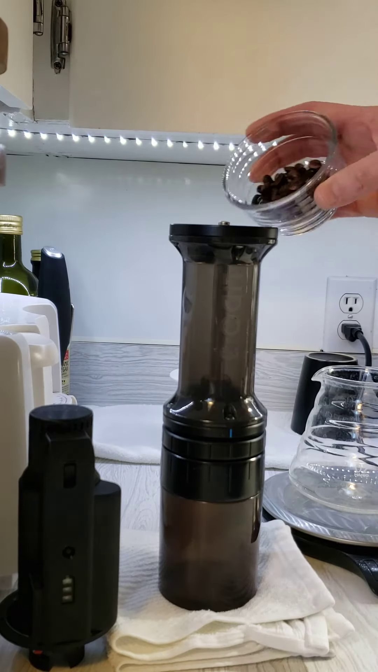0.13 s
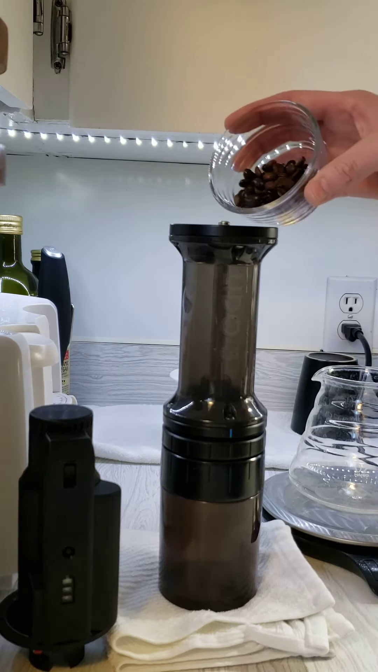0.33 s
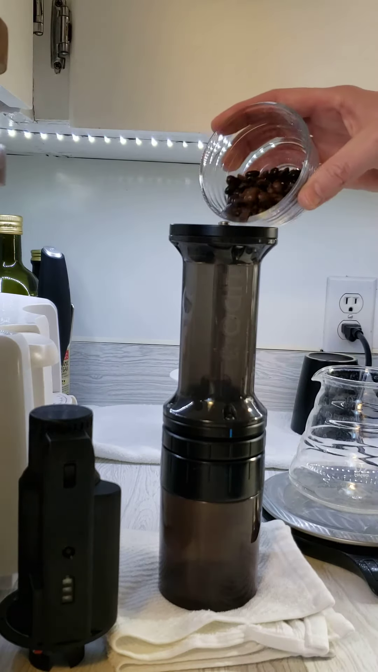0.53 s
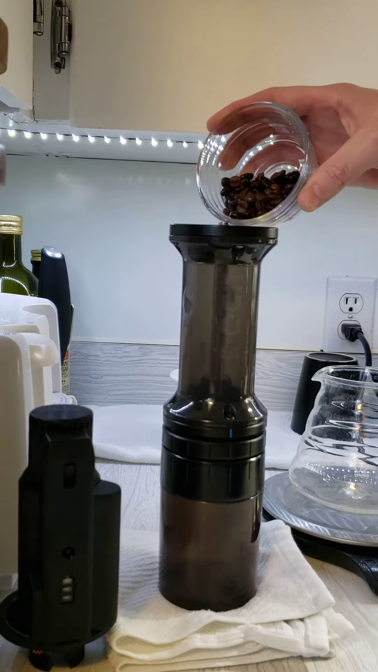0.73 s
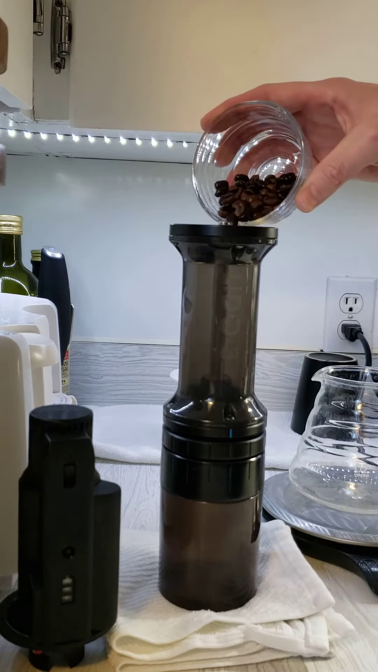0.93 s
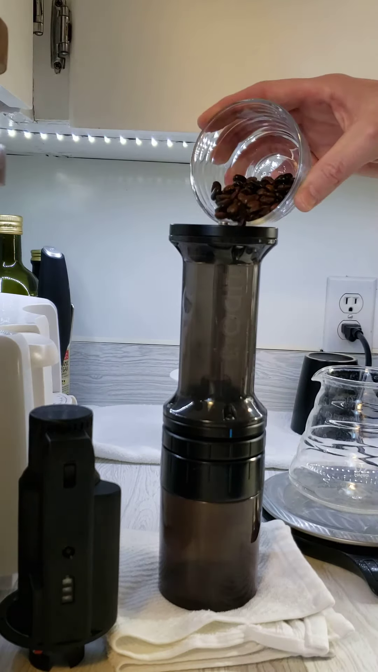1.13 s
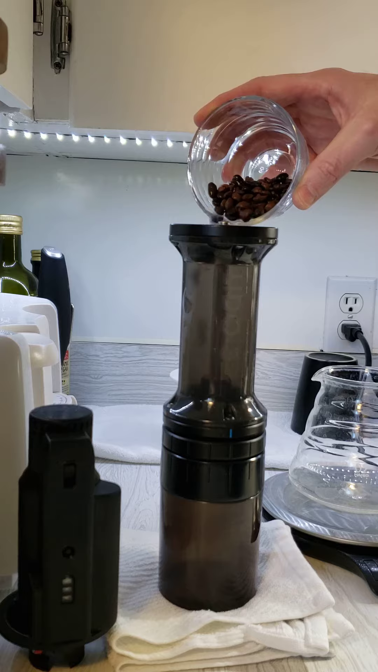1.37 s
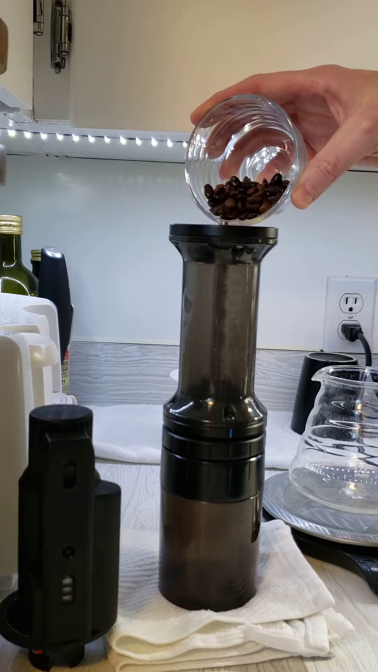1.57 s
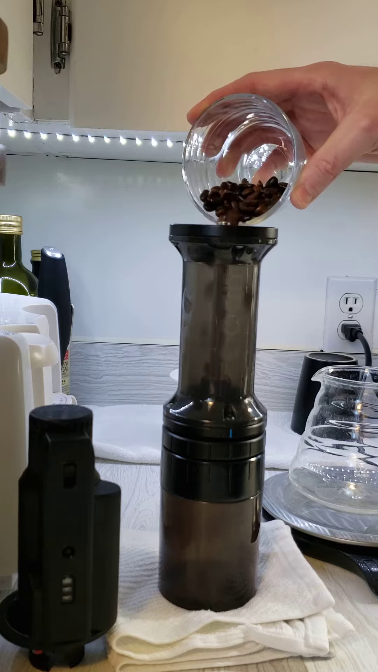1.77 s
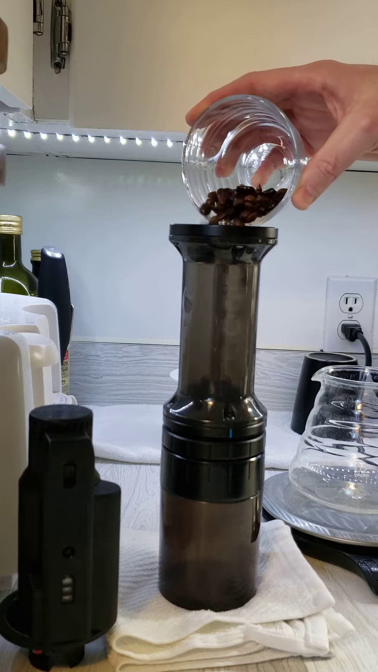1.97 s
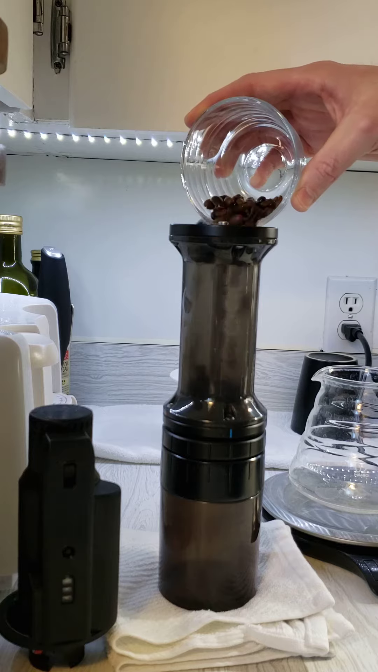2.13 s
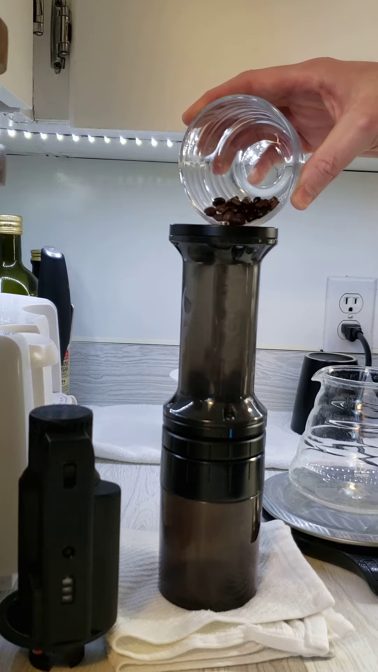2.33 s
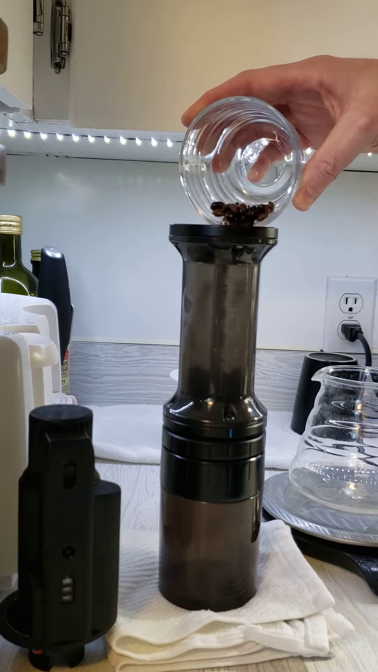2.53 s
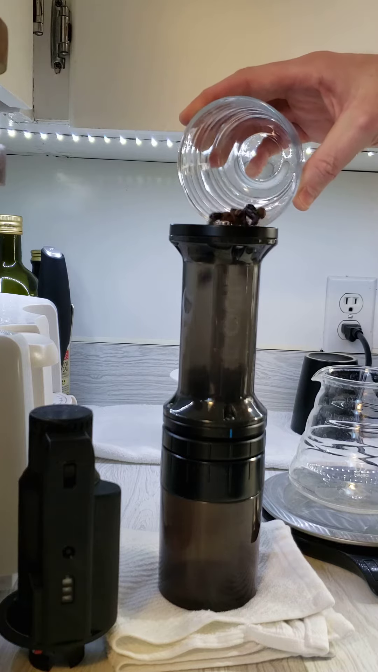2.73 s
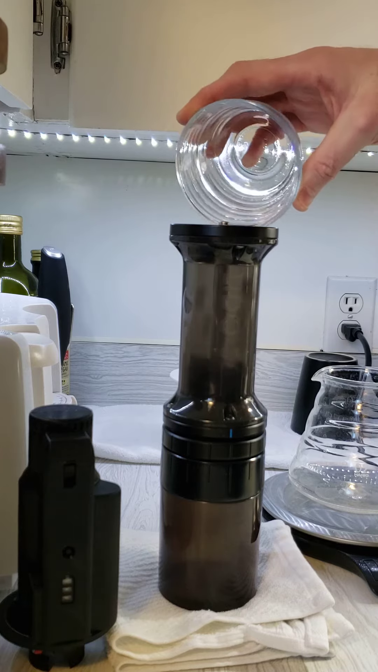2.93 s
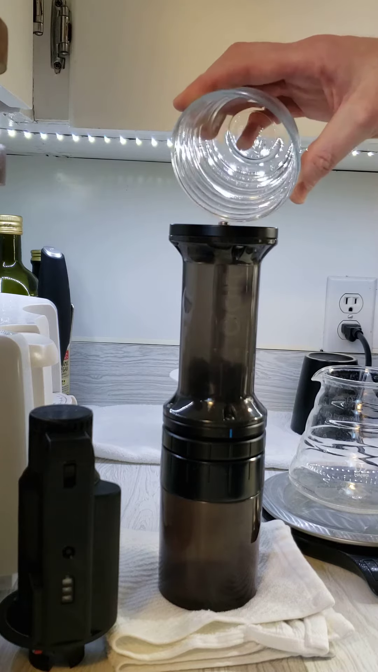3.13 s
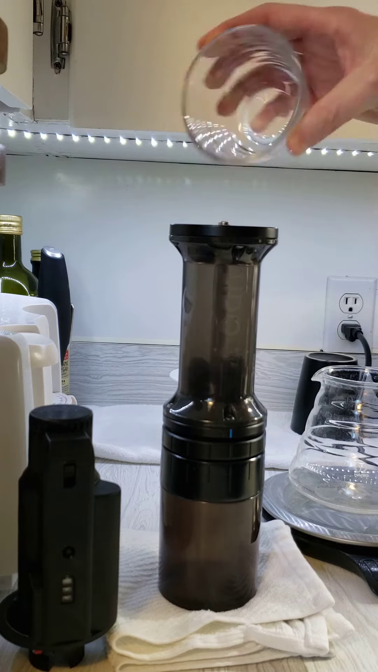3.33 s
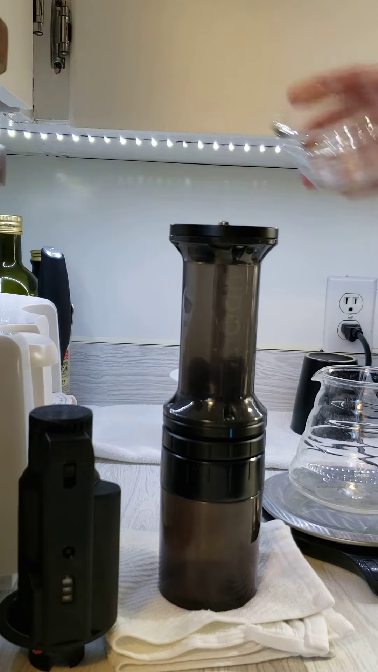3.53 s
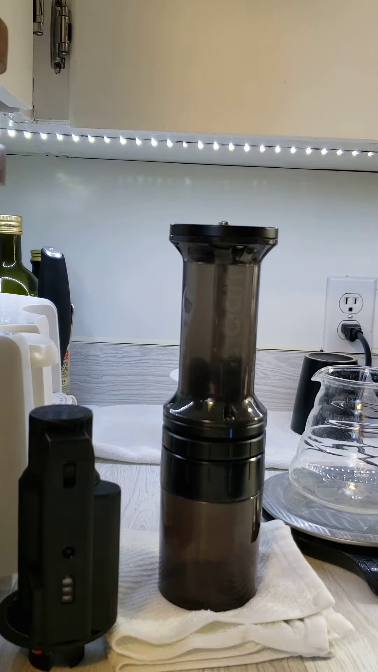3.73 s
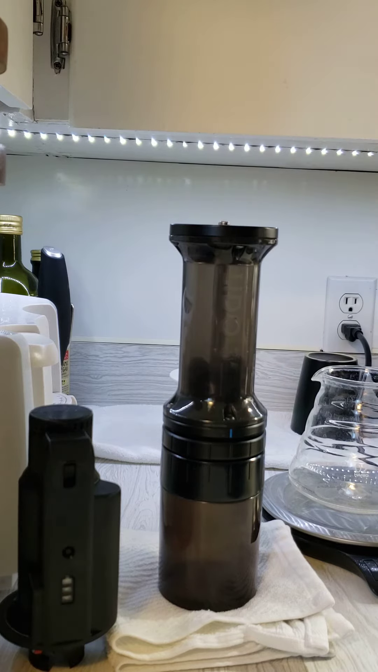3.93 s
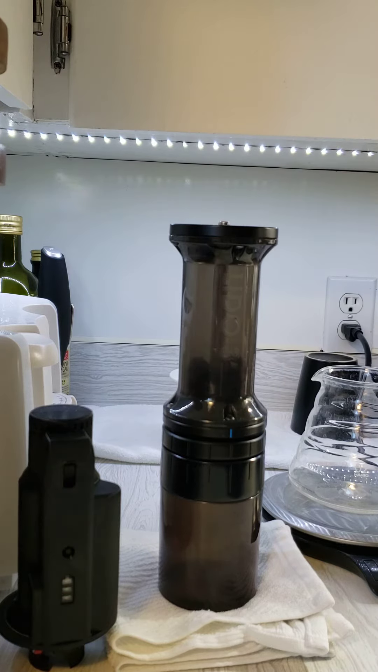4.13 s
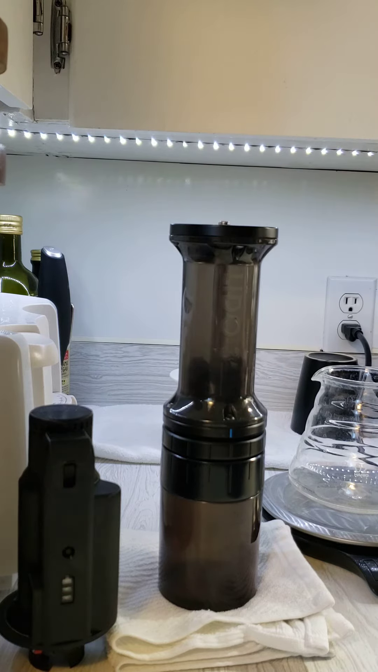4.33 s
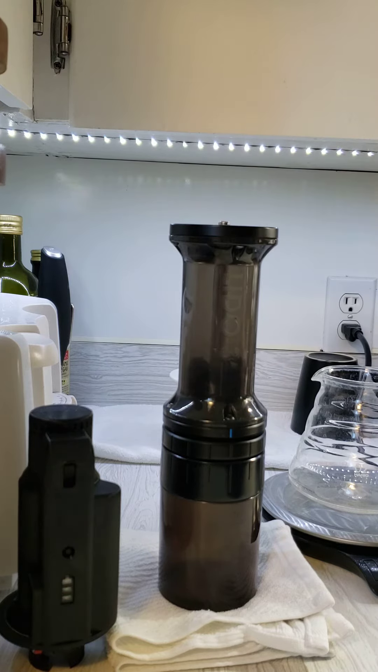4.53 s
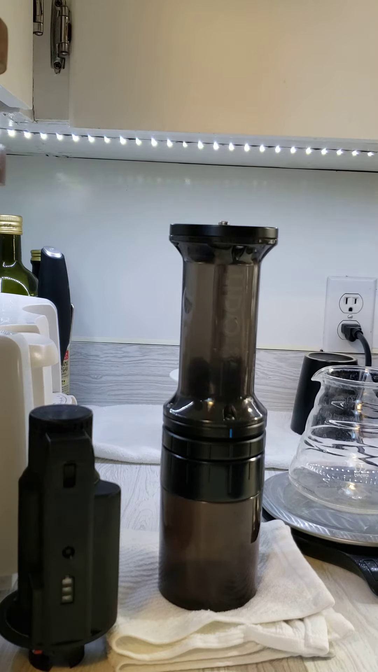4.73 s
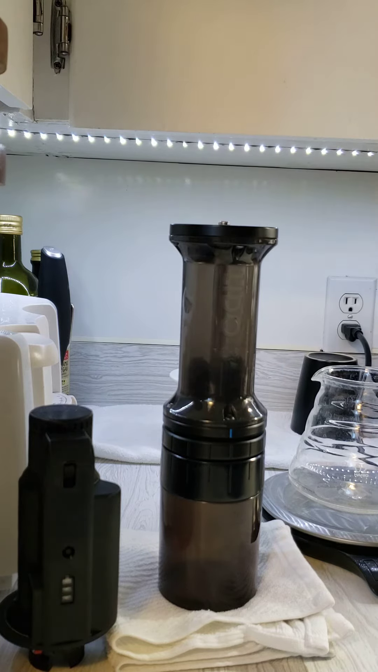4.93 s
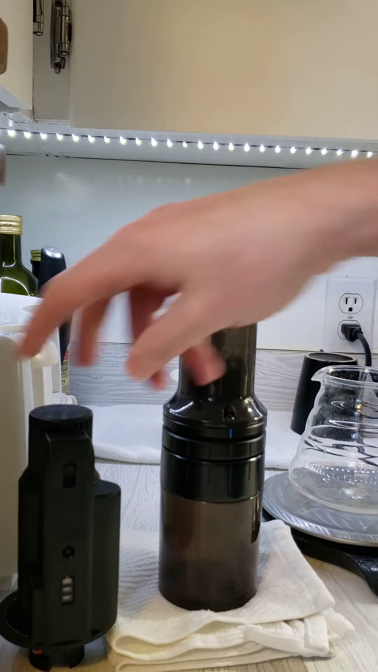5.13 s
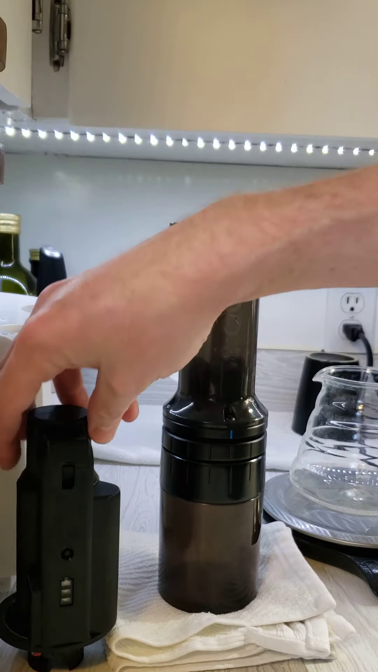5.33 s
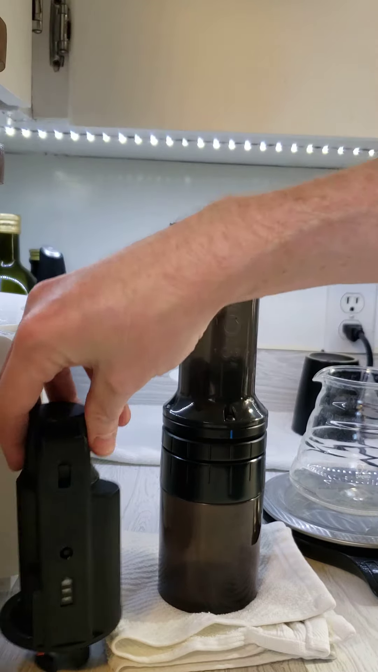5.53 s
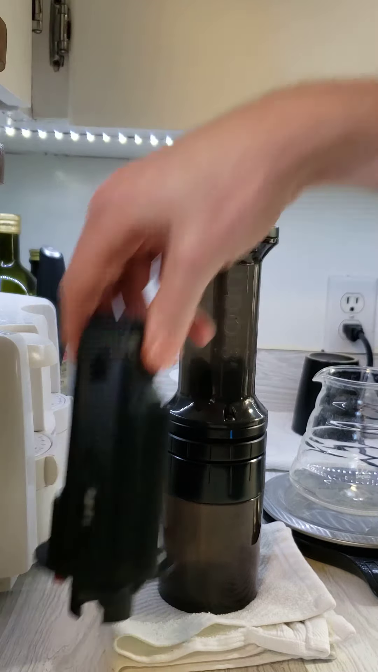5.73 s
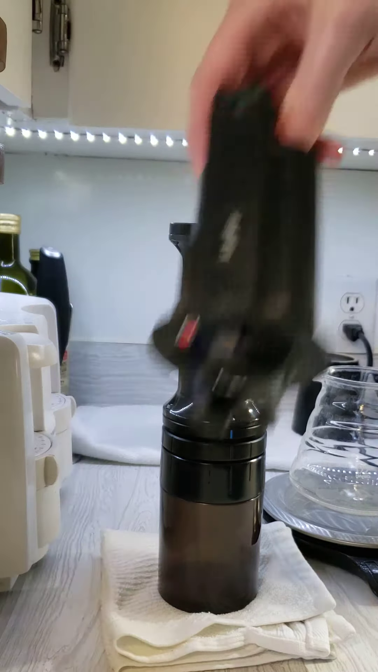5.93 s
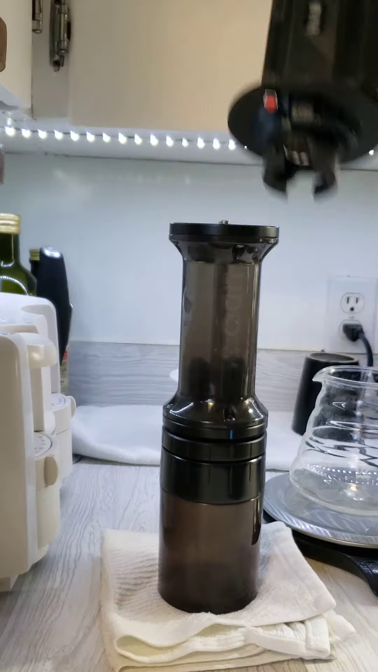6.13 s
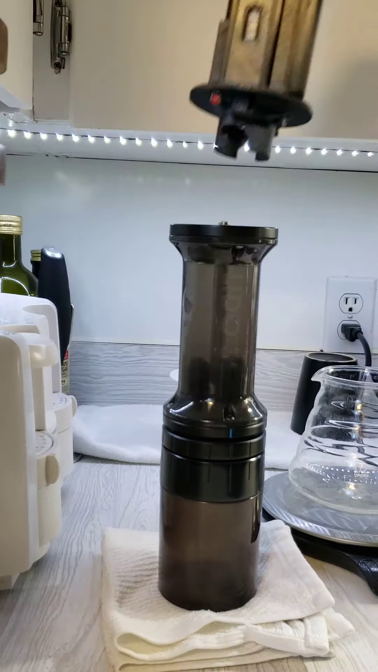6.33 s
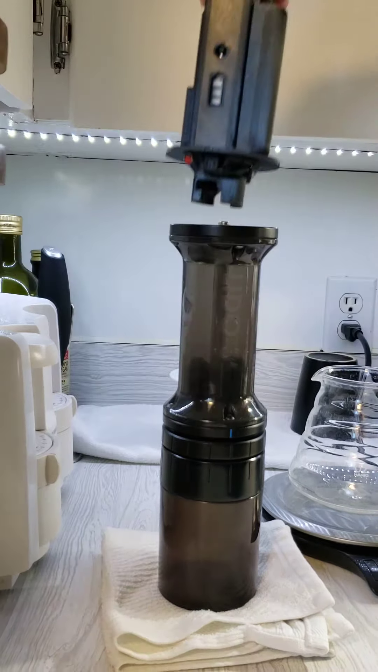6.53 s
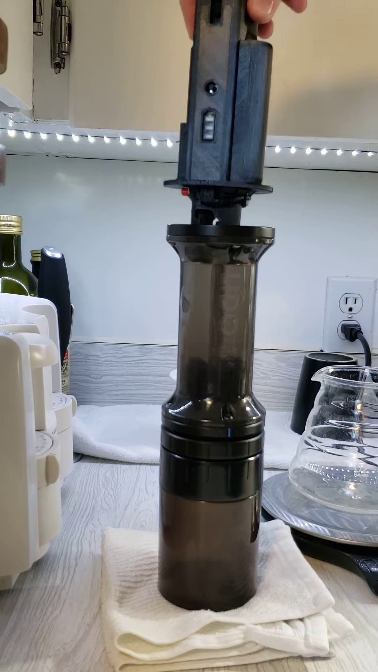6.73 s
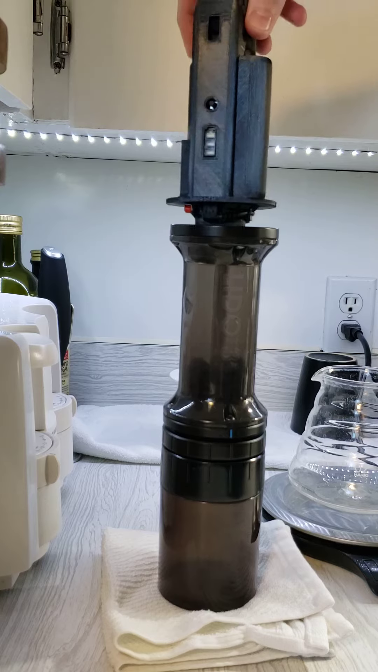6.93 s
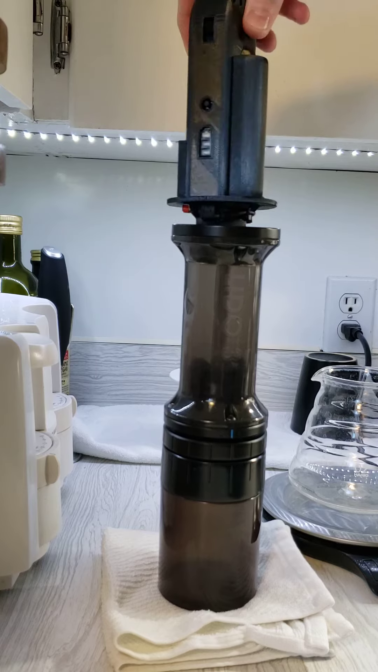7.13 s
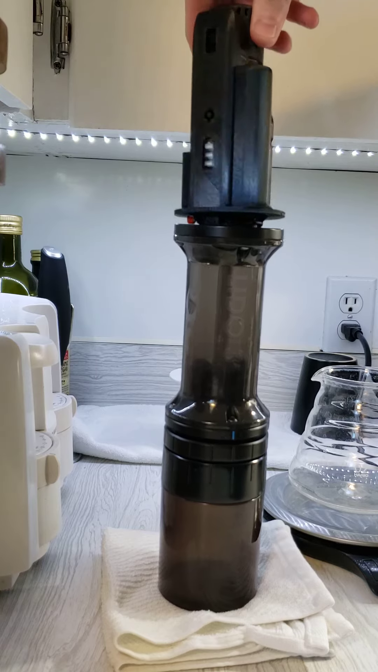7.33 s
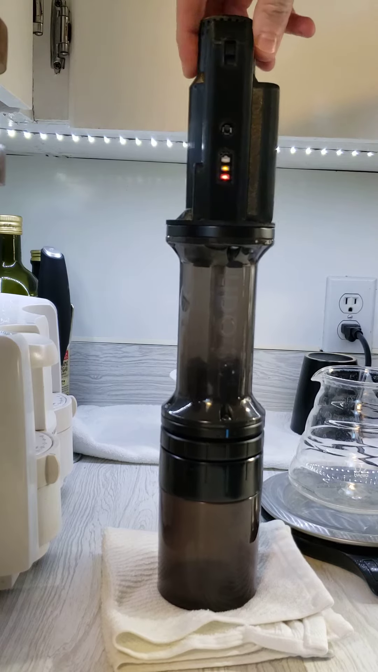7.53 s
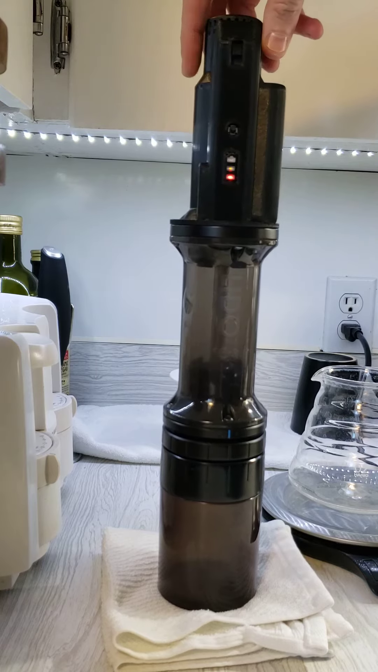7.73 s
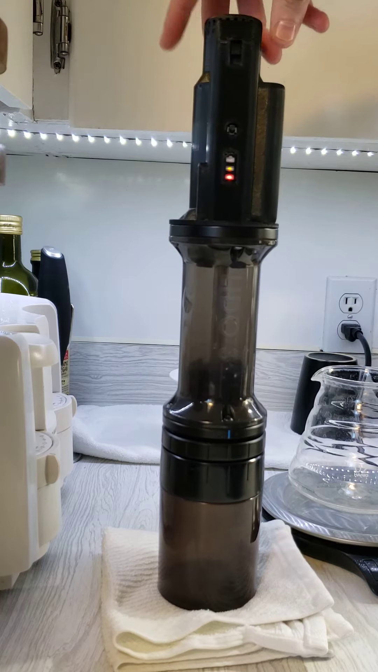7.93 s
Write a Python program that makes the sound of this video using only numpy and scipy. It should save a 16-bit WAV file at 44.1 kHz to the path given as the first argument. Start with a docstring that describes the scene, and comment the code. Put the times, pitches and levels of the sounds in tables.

```python
"""In a small kitchen, close by, coffee beans slide from a glass bowl into the plastic hopper of a hand grinder.
The bowl is put down on the counter; a motor driver is picked up, seated on the shaft and crushes the beans.
Beans, knocks and cracks are short noise bursts that make modes (the tones of an object) ring and are then coloured.
Noise and sines make the room tone, with its hum and an early hiss; a few muffled yaps come from far away."""
import sys
import numpy as np
from scipy import signal
from scipy.fft import rfft, irfft, next_fast_len
from scipy.io import wavfile
from scipy.ndimage import uniform_filter1d

SR = 44100
rng = np.random.default_rng(int(sys.argv[2]) if len(sys.argv) > 2 else 0)


def master(y):
    """Save y as 16-bit WAV."""
    cut = np.clip(np.atleast_2d(y).T, -1, 1)
    pcm = np.round(cut * 32767)  # scale
    wavfile.write(sys.argv[1], SR, pcm.astype(np.int16))


N = 357121
T = np.arange(N) / SR  # time of every sample, s
SIDES = np.array([[1], [-1]])  # left and right get opposite signs
TOP_HZ = 16000

# Levels in the tables are relative: small trims in the functions and the room still act on them.
# tones of the grinder's body: f/Hz, level/dB, time to fall by 60 dB/s
GRINDER_MODES = [(446, -3.5, 0.064), (880, -7.5, .06), (1416, 1, 0.017), (2597, -3.5, 0.03),
                 (2716, -7.5, 0.07), (3520, -5.5, .03)]


def undb(db):
    """Decibels to gain."""
    return 10 ** (np.asarray(db) / 20)


def unit(x):
    """Scale to rms 1."""
    return x / np.sqrt(np.mean(x ** 2) + 1e-20)


def curve(rows, axis=1):
    """One column of a table, joined by straight lines, at every sample."""
    rows = np.array(rows)
    return np.interp(T, rows[:, 0], rows[:, axis])


def during(rows, fade_s=.015):
    """1 while a table lasts, fading outside it."""
    outside_s = np.maximum(rows[0][0] - T, T - rows[-1][0])
    return np.exp(-np.maximum(0, outside_s) / fade_s)


def fall(t, t60):
    """Exponential decay by 60 dB in t60 seconds."""
    return np.exp(-np.log(1000) * t / t60)


def swell(start, end, rise_s, fall_s):
    """Envelope that rises into start, holds until end and dies away; 60 dB take rise_s and fall_s."""
    return fall(np.maximum(start - T, 0), rise_s) * fall(np.maximum(T - end, 0), fall_s)


def walk(rate):
    """Smooth chance with a spread near 1, from a new random value rate times a second."""
    k = int(SR / rate)
    steps = np.repeat(rng.standard_normal(N // k + 2), k)
    return unit(uniform_filter1d(steps, k)[:N])


def scatter(size):
    """Noise scattered by nearby surfaces, only partly alike left and right."""
    mid, side = rng.standard_normal((2, size))
    return mid + 1.06 * side * SIDES


def convolve(x, response):
    """Pass each channel through an impulse response."""
    return signal.oaconvolve(x, np.atleast_2d(response), axes=1)[:, :x.shape[1]]


def on_log_axis(points, hz):
    """Join (Hz, value) points on a log-frequency axis."""
    f, value = np.transpose(points)
    return np.interp(np.log(hz + 1), np.log(f), value)


def colour(x, spectrum, size=4096):
    """Filter to the given spectrum, falling steeply below its lowest point, with no sound ahead of its cause."""
    hz = np.arange(size // 2 + 1) * SR / size
    low_cut = np.minimum((hz + 2) / spectrum[0][0], 1) ** 2
    gain = undb(on_log_axis(spectrum, hz)) * low_cut
    # folding the cepstrum gives a minimum-phase filter: its energy comes as early as possible
    cepstrum = irfft(np.log(gain))
    cepstrum[1:size // 2] *= 2
    cepstrum[size // 2 + 1:] = 0
    return convolve(x, irfft(np.exp(rfft(cepstrum))))


def split(x, hz):
    """The parts below and above a frequency."""
    low_pass = signal.butter(2, min(hz, SR / 2 - 1), fs=SR, output="sos")
    low = signal.sosfiltfilt(low_pass, x)
    return low, x - low


def ring(x, modes, ring_db):
    """The contact itself plus the modes it excites; ring_db sets how strong they are."""
    t = T[:SR // 4]
    tail = sum(undb(db) * np.cos(2 * np.pi * hz * t) * fall(t, t60) for hz, db, t60 in modes)
    return x + undb(ring_db) * convolve(x, tail / np.linalg.norm(tail))


def contact(crack_t60, chatter_t60, chatter_db, size=11000):
    """A sharp crack and weaker or longer chatter in one noise burst, different every time."""
    t = T[:size]
    return scatter(size) * (fall(t, crack_t60) + undb(chatter_db) * fall(t, chatter_t60))


def add(track, s, sound, db, size=128):
    """Put a sound into a track, its loudest few milliseconds at the given level."""
    i = int(s * SR)
    power = np.mean(sound ** 2, axis=0)
    peak = np.sqrt(uniform_filter1d(power, size, mode="constant").max())
    track[:, i:i + sound.shape[1]] += (sound * undb(db) / peak)[:, :N - i]


def bean_click(t60, count=3, size=900):
    """A hard little shell: a crack and a few short modes, different for every bean."""
    t = T[:size]
    hz = rng.uniform(2500, TOP_HZ, (count, 1))
    phase = rng.uniform(0, 2 * np.pi, (2, count, 1))
    shell = np.sin(2 * np.pi * hz * t + phase).sum(1) * fall(t, t60)
    return contact(0.001, 0.084, -10, size=size) + 0.49 * shell


def grains(rows, rate, spread_db, t60):
    """Random bean contacts, rate a second, from just before a table to just after: many soft, a few hard."""
    start, end = max(rows[0][0] - .05, 0), min(rows[-1][0] + .05, T[-1])
    x = np.zeros((2, N))
    for when, force in rng.random((int(rate * (end - start)), 2)):
        i = int((start + when * (end - start)) * SR)
        click = bean_click(t60)[:, :N - i]
        x[:, i:i + click.shape[1]] += click * undb(spread_db * force ** 2)
    return x


def steady(x, size=2600):
    """Even out the slow swells of a stream to about rms 1, keeping its grain."""
    power = uniform_filter1d(np.mean(x ** 2, axis=0), size)
    return x / np.sqrt(np.abs(power) + power.max() / 1000)


def patchy(x, patchy_db, rate, count=9):
    """A changing mix of beans varies in colour: the bands of a stream rise and fall separately."""
    out = 0
    for hz in np.geomspace(700, 13000, count):
        band, x = split(x, hz)
        out = out + band * undb(patchy_db * walk(rate))
    return out + x


def kitchen(x, balance, room_db, t60=.3):
    """Direct sound and a short room tail; long waves reach both microphones alike."""
    # level of what differs between the two microphones: f/Hz, level/dB
    width = [(120, -28.5), (380, -9), (700, -3), (1300, 0)]
    t = T[:SR // 2]
    dull, bright = split(scatter(len(t)) * (1 - fall(t, 0.011)), 6500)
    # the treble of the room dies away sooner
    tail = dull * fall(t, t60) + bright * fall(t, 0.59 * t60)
    in_room = x + undb(room_db) * convolve(x, tail / np.linalg.norm(tail[0]))
    size = next_fast_len(N, real=True)
    hz = np.arange(size // 2 + 1) * SR / size
    left, right = rfft(in_room, size)
    differing = SIDES * (left - right) / 2 * undb(on_log_axis(width, hz))
    both = (left + right) / 2 + differing
    return irfft(both * undb(SIDES * on_log_axis(balance, hz) / 2), size)[:, :N]


def room_tone():
    """Noise makes low rumble and a wide hiss, sines make the appliance hum."""
    # colour of the rumble: f/Hz, level/dB
    rumble_spectrum = [(15, -46), (25, -18.5), (43, -9), (84, -6.5), (123, -2), (149, -20.5), (249, -24),
                       (293, -35.5), (3520, -51.5), (4370, -50), (8360, -56), (16000, -46)]
    # hum of the appliance: f/Hz, level/dB
    hum_lines = [(55, -67.5), (120, -68), (242, -85)]
    # a soft hiss that dies away as the pour starts: t/s, level/dB
    hiss_levels = [(0, -64.5), (.55, -62.5), (.9, -73), (1.3, -82)]
    air = unit(colour(scatter(N), rumble_spectrum)) * undb(-58)
    hum = 0
    for hz, db in hum_lines:
        hum = hum + np.sqrt(2) * undb(db + 1.5 * walk(2.3)) * np.sin(2 * np.pi * hz * T)
    hiss_spectrum = [(300, -3.0), (1200, -6), (2200, 1), (3800, 5), (6000, -9.5), (14000, -26.5)]
    hiss = unit(colour(scatter(N), hiss_spectrum))
    return air + hum + hiss * undb(curve(hiss_levels)) * during(hiss_levels)


def yaps():
    """Short rough calls, perhaps a dog's, as noise bursts of which the walls pass mainly one narrow band."""
    # far muffled yaps: t/s, level/dB
    calls = [(3.87, -64.5), (4.015, -53), (4.78, -58.5), (5.06, -55)]
    wall_spectrum = [(400, -9.0), (580, 1.5), (780, -11.0), (1100, -25.0), (6000, -53.5)]
    x, t = np.zeros((2, N)), T[:SR // 3]
    for s, db in calls:
        burst = scatter(len(t)) * t * fall(t, .19)
        muffled = ring(burst, [(615, 0, .09)], -17)
        add(x, s, colour(muffled, wall_spectrum), db)
    return x


def set_down():
    """The bowl lands on the counter, which rings, and settles in a few blows; softer ones are duller."""
    # blows of the bowl on the counter: t/s, level/dB
    blows = [(4.316, -25), (4.322, -24.5), (4.337, -26.5), (4.351, -35.5), (4.435, -38), (4.48, -50)]
    # colour of the counter: f/Hz, level/dB
    counter_spectrum = [(45, -33), (75, -9), (140, -1.5), (245, 1.5), (300, -6.5), (520, 3), (660, -4),
                        (830, -1), (1200, -8.5), (2000, -24.5), (2500, -26.5), (5000, -42.5), (7300, -41),
                        (9000, -54.5), (15000, -44)]
    # tones of the counter: f/Hz, level/dB, time to fall by 60 dB/s
    counter_modes = [(145.5, -3.5, 0.41), (312, -1, 0.42), (404, -5.5, 0.14), (501, 0, 0.26),
                     (810, -3, 0.2), (885, 2.5, 0.14), (1083, -9, 0.11)]
    x = np.zeros((2, N))
    for s, db in blows:
        blow = colour(ring(contact(0.036, 0.22, -9.0), counter_modes, -24.5), counter_spectrum)
        low, high = split(blow, 1700)
        add(x, s, low + high * undb(0.59 * (db + 25.5)), db + 3.0)
    return x


def handling():
    """Each touch of the driver: a plastic tick, a knock of the housing and a thud through the counter."""
    # the driver is gripped and seated: t/s, knock level/dB, tick level/dB, thud level/dB
    touches = [(5.289, -66, -55.5, -50.5), (5.417, -63, -57.5, -49.5), (5.461, -75, -66, -42.5),
               (6.682, -31, -38, -46), (6.705, -35, -64, -49), (6.713, -52, -66, -38.5),
               (6.934, -41, -70, -40), (7.233, -49, -49, -54), (7.272, -64, -51.5, -55),
               (7.335, -37, -47.5, -50.5), (7.395, -39.5, -55, -43)]
    # colours of the knock, the tick and the thud: f/Hz, level/dB
    knock_spectrum = [(150, -31), (350, 10.5), (800, 5.5), (1600, -1), (2800, -3), (6000, -25.5)]
    tick_spectrum = [(1000, -13), (2700, 3.5), (4500, -0.5), (7500, -5), (9000, -41), (15000, -11.5)]
    thud_spectrum = [(25, -13.5), (55, 5.5), (110, -1.5), (240, -6), (400, -24), (1200, -77)]
    x = np.zeros((2, N))
    for s, knock_db, tick_db, thud_db in touches:
        knock = ring(contact(0.059, 0.086, -5), GRINDER_MODES, -25)
        add(x, s, colour(knock, knock_spectrum), knock_db - 10.0)
        tick = ring(contact(.02, .08, -11), GRINDER_MODES, -22)
        add(x, s, colour(tick, tick_spectrum), tick_db - 4)
        thud = contact(0.041, 0.29, -1)
        add(x, s, colour(thud, thud_spectrum), thud_db + .5)
    return x


def rim_knocks():
    """Glass against plastic rings the body of the grinder; one soft bump goes through the counter."""
    # the bowl's rim knocks on the hopper: t/s, level/dB
    knocks = [(0.635, -24), (0.647, -31), (0.995, -31.5), (1.058, -39.5), (1.205, -28.5), (2.897, -29.5),
              (2.971, -20)]
    # colour of these knocks: f/Hz, level/dB
    rim_spectrum = [(150, -19), (450, -8.5), (950, -13), (1300, -5), (1900, -14), (2700, 0.5), (3600, -8),
                    (7500, -6.5), (14000, -28)]
    x = np.zeros((2, N))
    for s, db in knocks:
        knock = ring(contact(0.035, 0.17, -6), GRINDER_MODES, -17)
        add(x, s, colour(knock, rim_spectrum), db - 5.0)
    bump_spectrum = [(50, -12.0), (85, 7), (150, -15.0), (600, -56.5)]
    add(x, 1.322, colour(contact(0.098, .2, -8), bump_spectrum), -44)
    return x


def bowl():
    """Beans shift in the tilting bowl and tap the glass, making it ring."""
    # beans shifting in the bowl: t/s, level/dB
    shifting = [(0, -91), (.09, -48), (.15, -71), (.31, -60), (.35, -53.5), (.51, -45.5), (.62, -52)]
    # beans tapping the glass: t/s, level/dB
    taps = [(0.0456, -45), (0.0985, -56), (0.3311, -26.5), (0.385, -34.5), (0.4054, -26), (0.441, -27.5),
            (0.4816, -27.5), (0.501, -23), (0.5333, -30), (0.559, -32.5)]
    # tones of the glass: f/Hz, level/dB, time to fall by 60 dB/s
    glass_modes = [(2000, -14, 0.044), (4340, -6, 0.052), (7606, -12, 0.083), (7720, -6.5, 0.058),
                   (11880, -15.5, 0.035)]
    # colour of the glass: f/Hz, level/dB
    glass_spectrum = [(400, -64), (2000, -16.5), (4300, -8.5), (7700, -4), (8800, -15.5), (12000, -1.5),
                      (16000, -3.5)]
    rustle = ring(grains(shifting, 160, 10.5, 0.005), glass_modes, -5.5)
    x = steady(colour(rustle, glass_spectrum))
    x = x * undb(curve(shifting) - 2.0) * during(shifting)
    for s, db in taps:
        tap = ring(contact(0.0055, 0.027, 2.3), glass_modes, 0)
        add(x, s, colour(tap, glass_spectrum), db - 8.0)
    # the empty bowl sings faintly as it is lifted away
    singing = sum(undb(db) * np.sin(2 * np.pi * hz * T) for hz, db, _ in glass_modes[1:4])
    return x + undb(-74) * singing * swell(3.515, 3.53, .1, 0.081)


def load():
    """Gain of the crunch: light stirring, a surge as the burrs catch, then even work."""
    start_s, stir_db = 7.427, -41
    catch_s, catch_rise_s = 7.498, .018
    surge_db, surge_fall_s, grind_db = 5, 0.052, -31
    stirring = undb(stir_db) * swell(start_s, catch_s, 0.019, .1)
    surge = surge_db * np.exp(-np.maximum(T - catch_s, 0) / surge_fall_s)
    caught = np.exp(-np.maximum(catch_s - T, 0) / catch_rise_s)
    return np.hypot(stirring, caught * undb(grind_db + surge))


def grinding():
    """Burrs crush the beans in quick bites; the gear train whines in sines that follow the motor's speed."""
    # the motor comes up to speed and holds it: t/s, share of full speed, whine level/dB
    motor = [(7.41, .5, -60), (7.44, .8, -20), (7.5, .98, -3), (7.62, 1, 0), (8.1, 1, 0)]
    # beans cracking in the burrs: t/s, level/dB
    cracks = [(7.4269, -39), (7.487, -19), (7.4972, -17), (7.5047, -17.5), (7.5117, -22.5), (7.5239, -14.5),
              (7.5596, -18.5), (7.7144, -19.5), (7.98, -21)]
    # colour of the burrs: f/Hz, level/dB
    burr_spectrum = [(35, -22), (60, -2.5), (189, -9), (437, 3.5), (732, -4.5), (882, -1), (1060, -3.5),
                     (1470, 1), (1950, -1), (2650, 0), (3900, -4), (5330, -10.5), (6900, -8.5),
                     (8320, -17.5), (11500, -13.5), (16000, -14.5)]
    # whine of the gears at full speed: f/Hz, level/dB
    gear_lines = [(405, -56), (442, -53), (526, -46), (1497, -46), (1690, -42), (2203, -57), (2601, -40.5),
                  (2754, -60)]
    speed = curve(motor) * (1 + 0.0035 * walk(30))
    running_s = np.cumsum(speed) / SR  # time as the motor counts it
    fractures = ring(grains(motor, 800, 13, 0.014), GRINDER_MODES, -33.0)
    crunch = steady(patchy(colour(fractures, burr_spectrum), patchy_db=3.0, rate=16), size=1500)
    # 50 bites a second at full speed, plus chance
    bites = undb(0.66 * np.sin(2 * np.pi * 50 * running_s) + 0.61 * walk(70))
    body, rest = split(crunch, 1200)
    middle, fines = split(rest, 4400)
    # once a turn the crunch swings between dull and bright; a turn lasts 0.41 s, dullest at 7.61 s
    turn = np.cos(2 * np.pi * (T - 7.61) / 0.41)
    # coarse pieces break bite by bite, while the fine grounds hiss evenly
    coarse = body * undb(-2.5 + 4 * turn) + middle * undb(-1.5 * turn)
    x = (bites * coarse + fines * undb(2)) * load()
    for s, db in cracks:
        crack = ring(contact(0.021, 0.064, 2.0), GRINDER_MODES, -15.5)
        add(x, s, colour(crack, burr_spectrum), db - 5.0)
    whine = 0
    for hz, db in gear_lines:
        whine = whine + undb(db + 1.8 * walk(25)) * np.sin(2 * np.pi * hz * running_s)
    return x + whine * undb(curve(motor, axis=2) - 7) * during(motor)


def pour():
    """Beans trickle and tumble into the hopper; each clump lands hard, and bigger clumps rattle longer and louder."""
    # even trickle of beans over the rim, following the tilt of the bowl: t/s, level/dB
    flow = [(0.6, -52.5), (1.2, -59.5), (1.45, -41.5), (1.86, -49), (2.03, -34), (2.24, -28.5),
            (2.47, -39.5), (2.97, -42), (3.1, -52), (3.24, -94)]
    # clumps of beans that tumble in: t/s, level of the hardest landing/dB, length/s
    clumps = [(0.6627, -24.5, 0.0017), (0.667, -27.5, 0.003), (0.8, -31.5, 0.0028), (0.842, -33.5, .02),
              (0.8617, -19.5, 0.0052), (1.092, -39.5, .008), (1.1383, -33.5, 0.00075), (1.192, -35, .004),
              (1.228, -33, 0.041), (1.342, -31, 0.023), (1.371, -32, 0.026), (1.399, -25.5, 0.019),
              (1.441, -26, 0.015), (1.4963, -27.5, .014), (1.564, -26.5, 0.042), (1.581, -25, 0.0056),
              (1.6367, -22, 0.0078), (1.688, -31.5, 0.0077), (1.73, -34.5, 0.013), (1.775, -29, 0.011),
              (1.788, -25.5, 0.0045), (1.8145, -25.5, 0.0019), (1.849, -25.5, .008), (1.8713, -24, 0.0081),
              (1.895, -29, 0.029), (1.981, -25.5, 0.0081), (2.03, -27, .01), (2.059, -21.5, 0.0046),
              (2.1098, -22.5, .012), (2.146, -27.5, 0.019), (2.238, -25.5, 0.0067), (2.2907, -26, 0.021),
              (2.358, -27.5, 0.0239), (2.453, -26, .022), (2.531, -30.5, 0.034), (2.621, -30, 0.013),
              (2.666, -28.5, 0.0053), (2.728, -32.5, 0.03), (2.8, -33, 0.0089), (2.843, -31.5, 0.01),
              (2.879, -32, 0.025), (2.922, -29, 0.037), (3.012, -29, 0.026), (3.0814, -29.5, 0.023),
              (3.1756, -43.5, 0.0021), (3.226, -34, 0.0033)]
    # colour of the hopper: f/Hz, level/dB
    hopper_spectrum = [(250, -26), (450, -22), (662, -25), (971, -27), (1580, -14.5), (2200, -13.5),
                       (2620, -4.5), (3280, -6), (4120, -4), (7200, 0.5), (8700, -6), (14900, 2),
                       (16000, -4.5)]
    # tones of the hopper: f/Hz, level/dB, time to fall by 60 dB/s
    hopper_modes = [(673, -7, 0.08), (1410, -9, 0.03), (1610, -11.5, 0.06), (2607, -9, 0.034),
                    (3987, -7, 0.037), (4146, -7, 0.035)]
    rattle_db = 9.5  # rattle against the clump's level in the table, for a clump 1 s long
    rattle_rise_s, rattle_fall_s = .03, .085  # times to gather and die away by 60 dB
    rattle = colour(ring(grains(flow, 400, 13, 0.025), hopper_modes, -7.5), hopper_spectrum)
    stream = steady(patchy(rattle, patchy_db=3.0, rate=34), size=1500)
    power = (undb(curve(flow)) * during(flow)) ** 2
    for s, db, length in clumps:
        envelope = swell(s, s + length, rattle_rise_s, rattle_fall_s)
        power = power + length * (undb(db + rattle_db) * envelope) ** 2
    x = stream * np.sqrt(power)
    for s, db, _ in clumps:
        click = contact(.016, .07, -16)
        shell = bean_click(0.033)
        click[:, :shell.shape[1]] += 2 * shell
        add(x, s, colour(ring(click, hopper_modes, -16.5), hopper_spectrum), db - .5)
    # the first beans strike the bare burr and sound bright; the growing heap cushions the later ones
    covered_s, bare_body_db = 0.71, -5.5
    bare = np.exp(-(np.maximum(T - clumps[0][0], 0) / covered_s) ** 2)
    low, high = split(x, 11000)
    return low * undb(bare_body_db * bare) + high


def scene():
    """All sources in the kitchen, in three groups with their own balance and room level."""
    # how much louder the left is, for the beans, the driver and the rest: f/Hz, left minus right/dB
    pour_balance = [(700, 0.5), (1300, 5.5), (2400, 2.5), (4400, 7), (8100, 7), (15000, 6.5)]
    grind_balance = [(100, 2.9), (500, 0.7), (1300, 2.8), (2400, 3.9), (4400, 2.8), (8100, 9.7),
                     (15000, 3.1)]
    counter_balance = [(100, 4), (380, 2.5), (1000, 3), (4400, 3.5)]
    beans = kitchen(bowl() + pour() + rim_knocks(), pour_balance, -10)
    driver = kitchen(handling() + grinding(), grind_balance, -5.0)
    further = kitchen(set_down() + yaps() + room_tone(), counter_balance, -13.5)
    return beans + driver + further


def record(dry):
    """The recorder cuts the top with a steep low-pass filter."""
    return signal.sosfilt(signal.ellip(10, .2, 80, TOP_HZ, fs=SR, output="sos"), dry)


dry = scene()
out = record(dry)
master(out)
```